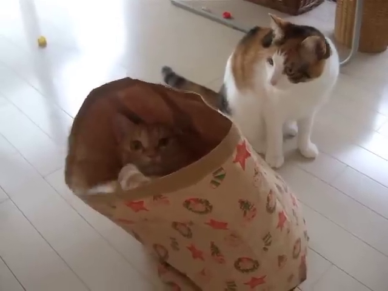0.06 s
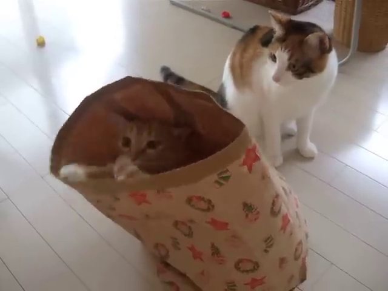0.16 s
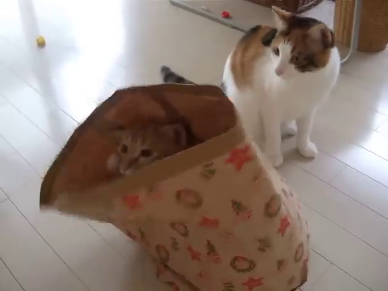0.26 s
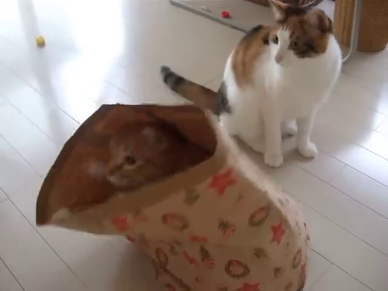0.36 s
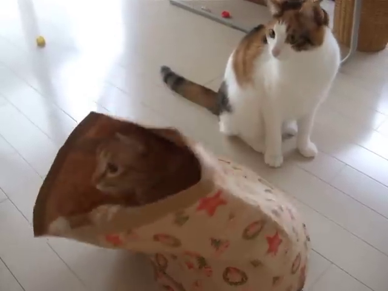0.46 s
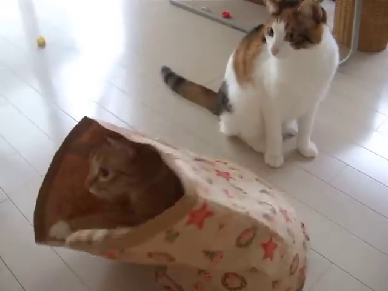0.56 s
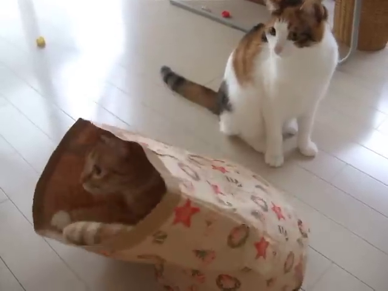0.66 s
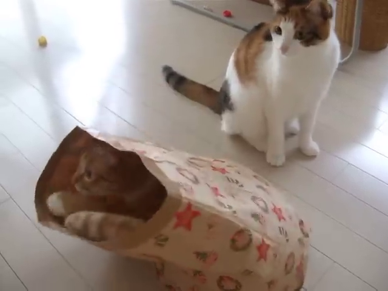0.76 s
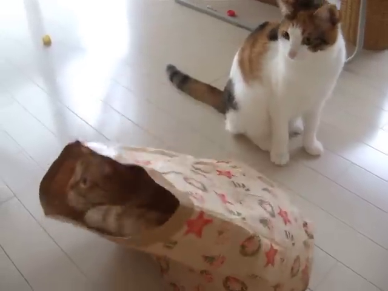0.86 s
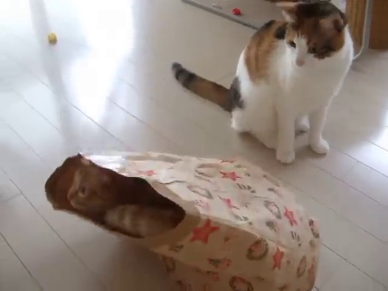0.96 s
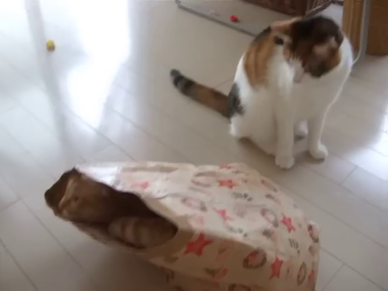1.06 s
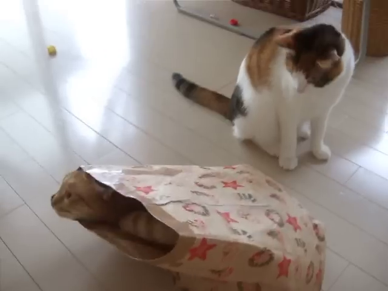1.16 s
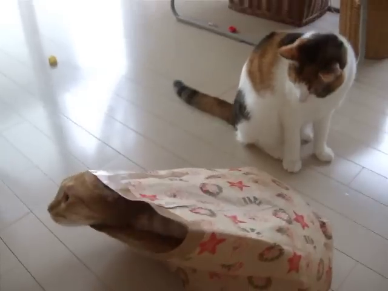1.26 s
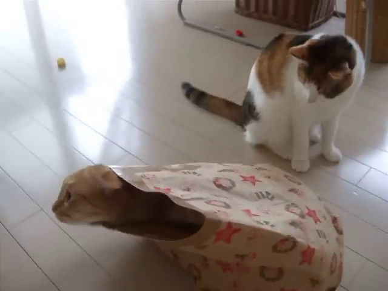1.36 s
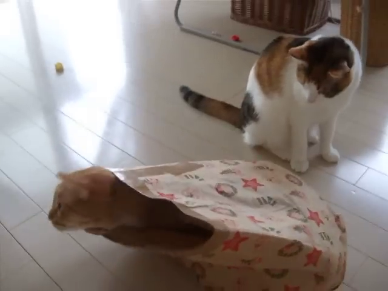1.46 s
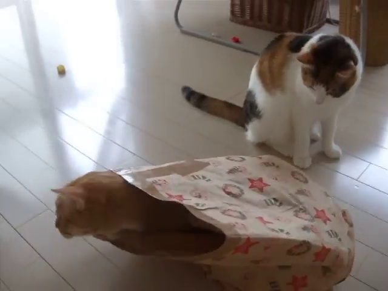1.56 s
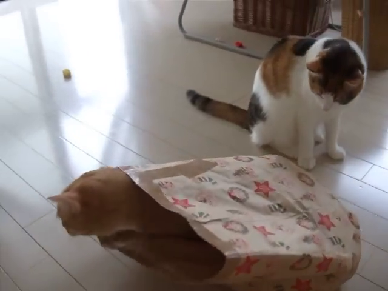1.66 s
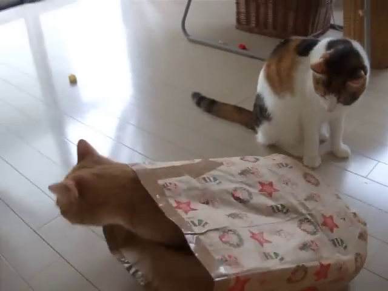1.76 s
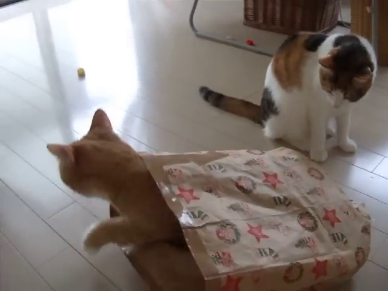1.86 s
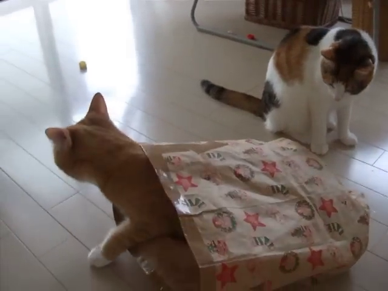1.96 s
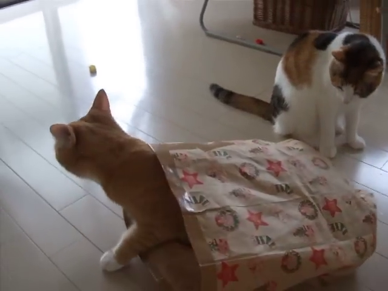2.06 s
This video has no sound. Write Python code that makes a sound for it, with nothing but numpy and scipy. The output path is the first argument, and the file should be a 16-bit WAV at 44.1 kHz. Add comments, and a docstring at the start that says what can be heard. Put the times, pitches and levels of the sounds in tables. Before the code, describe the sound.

Close paper bag noise on a hard living-room floor: faint hiss, a sudden cluster of crisp creases and hollow pops, scattered crackles, two more busy bursts with dull bumps, then fading rustle; brief room ring, limited treble.

```python
"""Quiet room noise and a soft paper hiss come first; then a cat scrambles inside a stiff paper bag.
The bag tips over and slides on a hard living-room floor: dense clicks make its hiss and fine crinkling.
Short noise bursts make snapping creases, hollow knocks and bumps; fading sine waves make panel pops.
The room rings briefly after every bag sound except the rubbing hiss."""
import sys
import numpy as np
from scipy import signal
from scipy.fft import rfft, irfft, next_fast_len
from scipy.io import wavfile

SR = 44100
rng = np.random.default_rng(int(sys.argv[2]) if len(sys.argv) > 2 else 0)


def unload_audio(sound):
    """Save the sound as a 16-bit wav file, at the path given as the first command line argument."""
    columns = np.transpose(np.atleast_2d(sound))
    # keep every value between -1 and 1, then stretch to whole-number steps
    steps = np.round(np.clip(columns, -1, 1) * 32767)
    wavfile.write(sys.argv[1], SR, steps.astype(np.int16))


N = 94815

# tone of the quiet room noise: (frequency [Hz], level [dB])
AMBIENCE_COLOUR = [(28, 3), (55, 4.5), (220, -1.5), (700, -5), (1500, -19), (8000, -20)]
# time for the room's ringing to fade by 60 dB: (frequency [Hz], fade time [s])
ROOM_FADE = [(600, 0.51), (4000, 0.25), (8000, 0.45)]
# strength of the room's ringing: (frequency [Hz], level against the direct sound [dB])
ROOM_LEVEL = [(200, -1.5), (600, -4.5), (4000, -9), (8000, -14)]
# hiss of paper rubbing on fur and floor: (time [s], level [dB])
RUB_LEVEL = [(0, -56), (.06, -55.5), (.08, -46), (.42, -46), (.49, -41.5), (.60, -51.5), (.67, -44),
             (.81, -44.5), (.91, -46.5), (1.25, -46), (1.50, -38), (1.66, -52), (1.82, -41), (1.92, -51.5),
             (2.15, -49)]
# tone of the rubbing hiss: (frequency [Hz], level [dB])
RUB_COLOUR = [(400, -5), (900, 2), (1400, -2), (3000, -0.5), (7300, 5), (8500, -5)]
# fine crackle as the bag is bent, before its uneven spurts: (time [s], level [dB])
CRINKLE_LEVEL = [(0, -59), (.21, -53.5), (.255, -35), (.33, -41.5), (.40, -44.5), (.535, -39.5),
                 (.59, -49.5), (.66, -42), (.72, -47), (.82, -63.5), (.98, -50), (1.02, -39.5),
                 (1.09, -50.5), (1.16, -44), (1.24, -39), (1.36, -49.5), (1.55, -50.5), (1.74, -38.5),
                 (1.86, -44), (1.99, -57.5)]
# tone of the fine crackle: (frequency [Hz], level [dB])
CRINKLE_COLOUR = [(170, -6), (350, 4), (750, 3.5), (1700, 2), (4000, -2), (8000, -18.5)]
# paws and bag bumping the floor: (time [s], level [dB])
BUMPS = [(.128, -46.5), (.285, -35.5), (.327, -32), (.413, -37), (.742, -41.5), (1.178, -31.5),
         (1.212, -31.5), (1.245, -33), (1.628, -38), (1.688, -31), (1.73, -35.5), (1.82, -37),
         (2.132, -44.5)]
# tone of the bumps: (frequency [Hz], level [dB])
BUMP_COLOUR = [(150, -7), (280, -2), (450, -2.5), (650, -10)]
# deep thuds of the cat's weight: (time [s], level [dB])
THUDS = [(.286, -37), (1.23, -48), (1.686, -44.5)]
# tone of the thuds: (frequency [Hz], level [dB])
THUD_COLOUR = [(45, 0.0048), (110, 0.052)]
# panels buckling: (time [s], level [dB], pitch [Hz])
POPS = [(.146, -37.5, 770), (.330, -26.5, 735), (.449, -30, 936), (.459, -32.5, 1017), (0.507, -30.5, 870),
        (.534, -31, 1034), (.549, -28, 834), (.784, -37.5, 846), (.931, -28.5, 750), (1.031, -33, 780),
        (1.105, -29, 890), (1.110, -27, 986), (1.196, -44, 1090), (1.214, -31.5, 890), (1.244, -27.5, 980),
        (1.303, -27, 835), (1.394, -29.5, 910), (1.480, -34, 840), (1.497, -31.5, 1100),
        (1.688, -27.5, 974), (1.727, -31.5, 594), (1.820, -25.5, 960)]
# ways a panel swings: (multiple of the pitch [ratio], level [dB])
PANEL_MODES = [(0.661, -8.5), (1, 3.5), (1.798, -8.5)]
# creases snapping: (time [s], level [dB], brightness [dB per octave],
# ring of the creased patch [Hz], level of the bag's hollow knock [dB])
SNAPS = [(.221, -37.5, -1, 2600, -33.5), (0.2349, -27.5, -9.5, 3000, -29), (0.2482, -15.5, -1, 2410, -27),
         (0.261, -46, -4, 2660, -31), (0.2851, -16.5, -3.5, 3610, -31.5), (0.2947, -19, 5, 4380, -29),
         (0.2977, -27.5, 1, 4340, -27), (.3275, -27.5, -10.5, 2730, -23.5), (0.4829, -21, -2.5, 6700, -34),
         (0.5215, -21.5, -3.5, 1800, -56), (0.621, -34.5, -7, 2140, -35.5),
         (0.6577, -25.5, -3, 6200, -32.5), (0.7011, -25.5, -2, 3140, -36), (0.8436, -25.5, -3, 3480, -35.5),
         (0.9091, -31.5, -10, 2600, -36.5), (1, -24.5, -2.5, 6070, -27.5), (1.1216, -27, -4.5, 2700, -32.5),
         (1.1799, -29.5, -10, 2400, -28), (1.1828, -29, 8, 7000, -45), (1.1904, -28, -1, 7300, -27),
         (1.217, -38, -2, 4560, -31), (1.231, -24.5, -4.5, 2600, -30.5), (1.2453, -25, -4.5, 6160, -22),
         (1.2609, -23, -5, 5780, -28), (1.3024, -34, -9, 1670, -32.5), (1.3174, -22.5, -5, 7500, -29),
         (1.5119, -30, -6.5, 1560, -37.5), (1.5634, -29, -0.5, 5370, -29.5), (1.574, -36, 0, 3450, -36),
         (1.5845, -23.5, -6.5, 1730, -31), (1.5976, -19, 1, 4920, -28), (1.6286, -20.5, -7, 3300, -29),
         (1.686, -20.5, -5, 7700, -24), (1.7052, -22.5, -5, 2320, -38), (1.751, -31.5, -8, 5000, -45),
         (1.78, -29.5, -5, 3230, -33), (1.8099, -25, -2.5, 3170, -32), (1.812, -24, 0.5, 5400, -31),
         (1.8163, -30.5, 0, 3560, -32.5), (1.8477, -23, -7, 7750, -31), (1.971, -33, -4.5, 2000, -35)]
# tone of cracks and ticks before their brightness tilt: (frequency [Hz], level [dB])
SNAP_COLOUR = [(1300, -6.5), (2400, 1), (4200, 0), (5600, 2), (7000, 3.5), (8500, -5.5)]
# tone of the hollow knock before its pitch shift: (frequency [Hz], level [dB])
HOLLOW_COLOUR = [(320, -6), (480, -9.5), (680, 3), (920, 6.5), (1400, -9)]

LEVEL_WINDOW_S = .005   # a short sound's level is its energy spread over this time
LEAD_S = .01   # room left before the moment of an event, for its rise
TIME = np.arange(N) / SR
EVENT_TIME = np.arange(4096) / SR - LEAD_S   # zero at the moment of the event

AMBIENCE_DB = -57.5
ROOM_ONSET_S = 0.0036
CUTOFF_HZ = 8250

RUB_GRAINS_PER_S, RUB_SPREAD_DB = 9000, 3
RUB_FLEX_DB = -7.5   # flexings of the dragged paper, against the hiss

CRINKLES_PER_S, CRINKLE_SPREAD_DB = 1500, 4
TICKS_PER_S, TICK_SPREAD_DB, TICK_DB = 180, 2.5, -3   # tick level is against the crackle
CLUMPS_PER_S, CLUMP_DB = 86, 3.5   # pace and unevenness of the spurts
FLEXES_PER_S, FLEX_Q = 200, 6   # all pitches together; higher Q rings longer
FLEX_DB = -3   # flexings of the bent paper, against the crackle
FLEX_LOW_HZ, FLEX_HIGH_HZ = 660, 1156

BUMP_RISE_S, BUMP_DECAY_S = .002, 0.0072
POP_RISE_S, POP_DECAY_S = 0.0007, 0.0018

SNAP_RISE_S, SHORTEST_SNAP_DECAY_S = .00065, .0008
SLOW_FOLD_DB = -4   # cracks duller than this (per octave) are slow folds, and last longer in proportion
FLUTTER_DB, FLUTTER_DECAY_S = -15, 0.006   # the crease creeps on after a snap
CREEP_STEPS_PER_S, CREEP_DB = 900, 3   # in uneven little steps
PATCH_RING_DB, PATCH_HALF_WIDTH_HZ = 7, 310
MEAN_BOUNCE_S, BOUNCE_SHARE = 0.000885, 0.3   # each crack bounces off the opposite wall of the bag
HOLLOW_RISE_S, HOLLOW_DECAY_S = .001, .0035
HOLLOW_SHIFT_OCTAVES = .25   # full range of the random pitch shift


def from_db(db):
    """Turn decibels into a plain gain."""
    return 10 ** (np.asarray(db) / 20)


def rms_one(x):
    """Scale a sound to an average strength (rms) of 1."""
    return x / np.sqrt(np.mean(x ** 2) + 1e-20)


def at_level(x, db):
    """Give a short sound the energy of this level held for one level window."""
    return from_db(db) * x * np.sqrt(LEVEL_WINDOW_S * SR / (np.sum(x ** 2) + 1e-20))


def at_hz(points, hz):
    """Read a table between its rows, with frequency spaced in octaves as we hear it."""
    frequency, value = np.transpose(points)
    return np.interp(np.log(hz), np.log(frequency), value)


def gain_curve(points):
    """Turn (time, level) rows into a gain that moves smoothly from row to row."""
    return from_db(np.interp(TIME, *np.transpose(points)))


def band(x, low, high):
    """Keep only the frequencies between low and high."""
    sos = signal.butter(2, [low, min(high, SR / 2 - 1)], "band", fs=SR, output="sos")
    return signal.sosfilt(sos, x)


def coloured(x, colour, tilt_db=0):
    """Filter to a table's tone, tilted per octave and falling steeply past its ends, with no pre-echo."""
    size = next_fast_len(2 * len(x))
    size += size % 2
    hz = np.maximum(np.arange(size // 2 + 1) * SR / size, 1)
    lowest, highest = colour[0][0], colour[-1][0]
    octaves_outside = np.maximum(np.log2(lowest / hz), 0) + np.maximum(np.log2(hz / highest), 0)
    tilt = tilt_db * np.log2(np.clip(hz, lowest, highest))
    db = at_hz(colour, hz) + tilt - 18 * np.minimum(octaves_outside, 3)
    # fold the log spectrum so that the filter acts only forward in time (minimum phase)
    cepstrum = irfft(np.log(from_db(db)))[:size // 2]
    cepstrum[1:] *= 2
    response = np.exp(rfft(cepstrum, size))
    return irfft(rfft(x, size) * response)[:len(x)]


def swell(rise_s, decay_s):
    """Exponential rise to the moment of an event, then exponential decay."""
    return np.exp(-np.maximum(-EVENT_TIME / rise_s, EVENT_TIME / decay_s))


def burst(envelope, count=2):
    """A short burst of noise under an envelope, with its spectrum partly evened out."""
    x = rng.standard_normal(len(envelope)) * envelope
    for _ in range(count):
        spectrum = rfft(x)
        evened = irfft(spectrum / (np.abs(spectrum) + 1e-12) ** .3)
        x = evened * envelope ** .1
    return x


def add(track, s, sound):
    """Mix an event into the track at its time."""
    start = max(int((s - LEAD_S) * SR), 0)
    part = sound[:max(N - start, 0)]
    track[start:start + len(part)] += part


def grains(per_s, spread_db):
    """Scatter random clicks of uneven size, pushing either way."""
    sizes = from_db(spread_db * np.minimum(rng.exponential(1, N), 4))
    signed_sizes = sizes * rng.choice([-1, 1], N)
    return signed_sizes * (rng.random(N) < per_s / SR)


def uneven_steps(count):
    """Random steps, kept from straying too far."""
    return np.clip(rng.standard_normal(count), -2, 2)


def ringing(x, hz):
    """Boost the resonance of one small patch of paper."""
    b, a = signal.iirpeak(hz, hz / (2 * PATCH_HALF_WIDTH_HZ), fs=SR)
    return x + (from_db(PATCH_RING_DB) - 1) * signal.lfilter(b, a, x)


def ambience():
    """Steady noise, shaped to the tone of a quiet room."""
    return from_db(AMBIENCE_DB) * rms_one(coloured(rng.standard_normal(N), AMBIENCE_COLOUR))


def room(x):
    """Diffuse reflections build up quickly and fade at a pace that depends on frequency."""
    t, response = TIME[:SR // 2], 0
    edges = np.geomspace(80, 10000, 13)
    for low, high in zip(edges, edges[1:]):
        hz = np.sqrt(low * high)
        fade = 1e-3 ** (t / at_hz(ROOM_FADE, hz))
        build_up = 1 - np.exp(-(t / ROOM_ONSET_S) ** 2)
        tail = band(rng.standard_normal(len(t)), low, high) * fade * build_up
        # make the table's level count against the direct sound in this band
        band_scale = np.sqrt(2 * (high - low) / SR / np.sum(tail ** 2))
        response = response + from_db(at_hz(ROOM_LEVEL, hz)) * tail * band_scale
    return signal.fftconvolve(x, response)[:N]


def flexing():
    """Small flexings of the panels: random clicks each ring at one of many pitches; rms 1."""
    pitches = np.geomspace(FLEX_LOW_HZ, FLEX_HIGH_HZ, 20)
    total = np.zeros(N)
    for hz in pitches:
        clicks = grains(FLEXES_PER_S / len(pitches), CRINKLE_SPREAD_DB) + 1e-18
        b, a = signal.iirpeak(hz, FLEX_Q, fs=SR)
        total += signal.lfilter(b, a, clicks)
    return rms_one(total)


def rubbing():
    """Fibres catch and slip so densely that they merge into a bright hiss; the drag also flexes the panels."""
    hiss = rms_one(coloured(grains(RUB_GRAINS_PER_S, RUB_SPREAD_DB), RUB_COLOUR))
    return gain_curve(RUB_LEVEL) * (hiss + from_db(RUB_FLEX_DB) * flexing())


def spurts():
    """A gain that wanders quickly at random; rms 1."""
    steps = uneven_steps(N // 40)
    wander = np.interp(TIME * CLUMPS_PER_S, np.arange(len(steps)), steps)
    return rms_one(from_db(CLUMP_DB * wander))


def crinkling():
    """Bending makes tiny creases crackle in spurts, with sharper ticks and panels flexing at many pitches."""
    crackle = rms_one(coloured(grains(CRINKLES_PER_S, CRINKLE_SPREAD_DB), CRINKLE_COLOUR))
    patches = np.geomspace(1500, 6000, 10)
    ticks = sum(ringing(grains(TICKS_PER_S / len(patches), TICK_SPREAD_DB), hz) for hz in patches)
    ticks = from_db(TICK_DB) * rms_one(coloured(ticks, SNAP_COLOUR, tilt_db=-4.5))
    paper = crackle + ticks + from_db(FLEX_DB) * flexing()
    return gain_curve(CRINKLE_LEVEL) * spurts() * paper


def bumps():
    """Soft, dull knocks on the floor, and deeper thuds when the cat's weight lands."""
    out = np.zeros(N)
    for table, colour in ((BUMPS, BUMP_COLOUR), (THUDS, THUD_COLOUR)):
        for s, db in table:
            knock = coloured(burst(swell(BUMP_RISE_S, BUMP_DECAY_S)), colour)
            add(out, s, at_level(knock, db))
    return out


def panels():
    """A panel flips over and swings very briefly in its heavily damped modes, each a sine wave."""
    out = np.zeros(N)
    for s, db, hz in POPS:
        swing = np.zeros(len(EVENT_TIME))
        for ratio, mode_db in PANEL_MODES:
            cycles = hz * ratio * EVENT_TIME + rng.random()
            swing += from_db(mode_db) * np.sin(2 * np.pi * cycles)
        add(out, s, at_level(swing * swell(POP_RISE_S, POP_DECAY_S), db))
    return out


def hollow():
    """A brief knock of the bag's hollow; its pitch varies at random as the bag changes shape."""
    shift = 2 ** (HOLLOW_SHIFT_OCTAVES * (rng.random() - .5))
    shifted_colour = [(hz * shift, db) for hz, db in HOLLOW_COLOUR]
    return coloured(burst(swell(HOLLOW_RISE_S, HOLLOW_DECAY_S)), shifted_colour)


def crack_envelope(tilt_db):
    """The loudness shape of a crack, drawn out when it is dull, with a ragged tail of smaller ones."""
    stretch = max(1, tilt_db / SLOW_FOLD_DB)
    steps = uneven_steps(len(EVENT_TIME))
    creep = np.interp((EVENT_TIME + LEAD_S) * CREEP_STEPS_PER_S, np.arange(len(steps)), steps)
    ragged = rms_one(from_db(CREEP_DB * creep))
    flutter = from_db(FLUTTER_DB) * ragged * swell(SNAP_RISE_S, FLUTTER_DECAY_S)
    return swell(SNAP_RISE_S, SHORTEST_SNAP_DECAY_S * stretch) + flutter


def creases():
    """Each crease gives way in a brief crack, which rings its own patch of paper and the hollow bag."""
    out = np.zeros(N)
    for s, db, tilt_db, hz, hollow_db in SNAPS:
        noise = coloured(burst(crack_envelope(tilt_db)), SNAP_COLOUR, tilt_db)
        crack = ringing(noise, hz)
        delay_s = MEAN_BOUNCE_S * (.5 + rng.random())
        bounce = np.interp(EVENT_TIME - delay_s, EVENT_TIME, crack)
        add(out, s, at_level(crack + BOUNCE_SHARE * bounce, db))
        add(out, s, at_level(hollow(), hollow_db))
    return out


def scene():
    """The bag and its echo in the room, with the rubbing hiss and quiet room noise."""
    bag = crinkling() + bumps() + panels() + creases()
    return (ambience() + room(bag) + rubbing() + bag)[None]


def record(dry):
    """A small microphone with a steep treble cut."""
    return signal.sosfilt(signal.cheby1(12, .1, CUTOFF_HZ, fs=SR, output="sos"), dry)


dry = scene()
out = record(dry)
unload_audio(out)
```